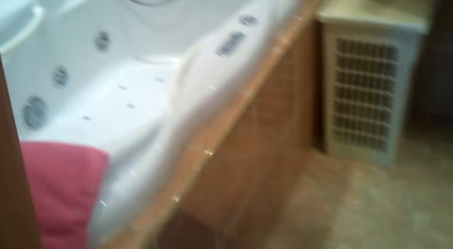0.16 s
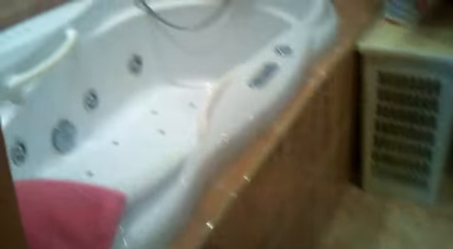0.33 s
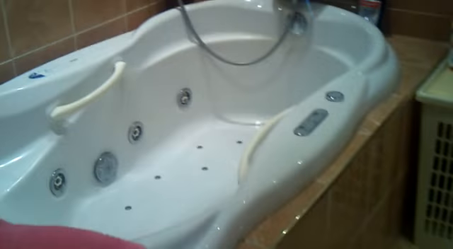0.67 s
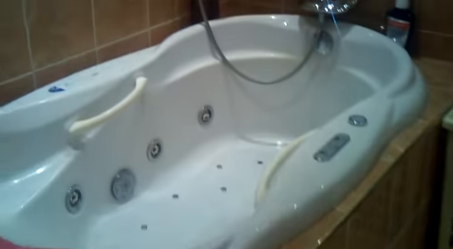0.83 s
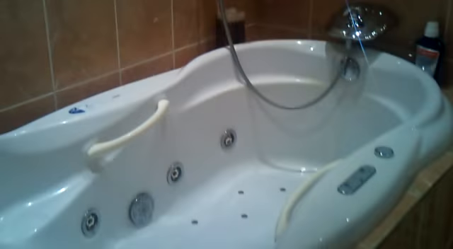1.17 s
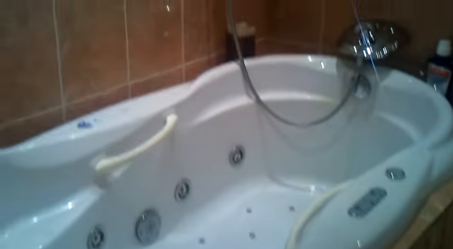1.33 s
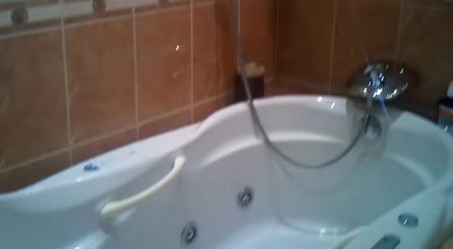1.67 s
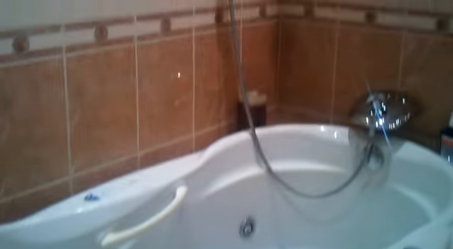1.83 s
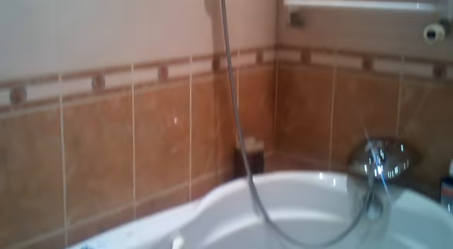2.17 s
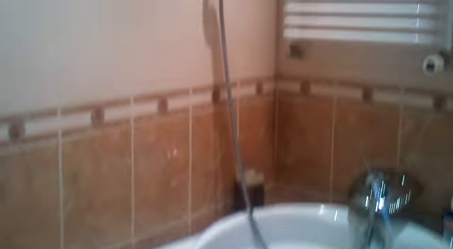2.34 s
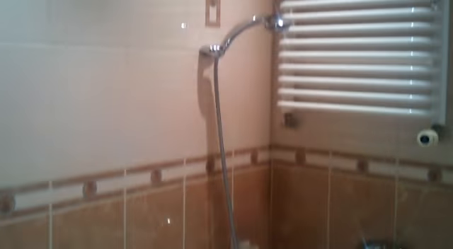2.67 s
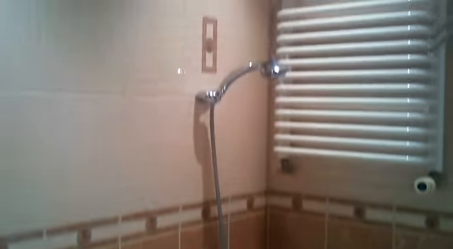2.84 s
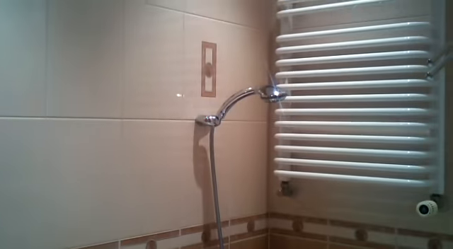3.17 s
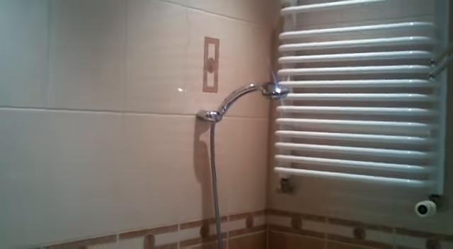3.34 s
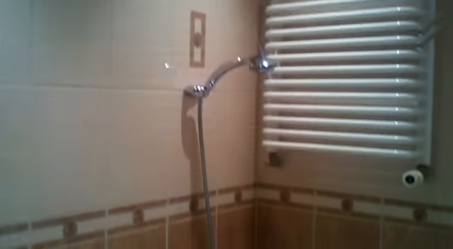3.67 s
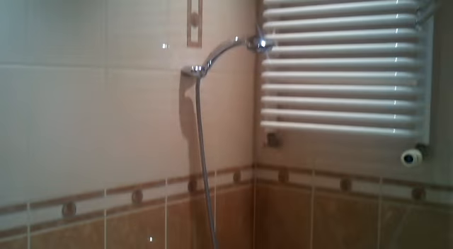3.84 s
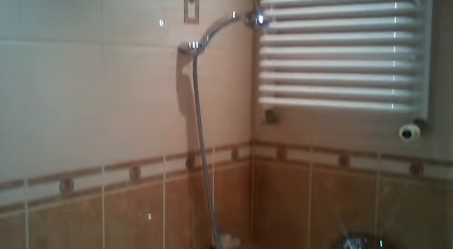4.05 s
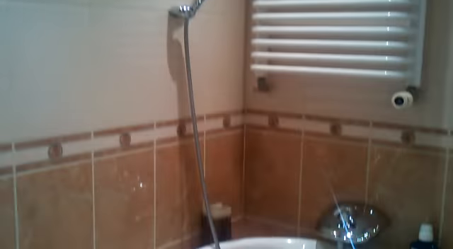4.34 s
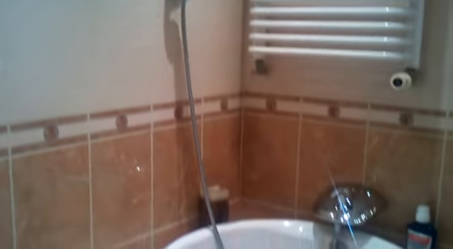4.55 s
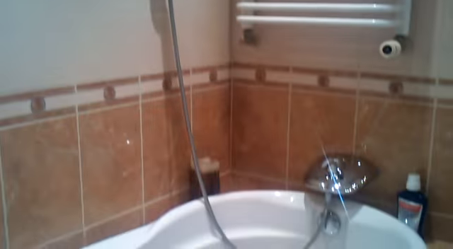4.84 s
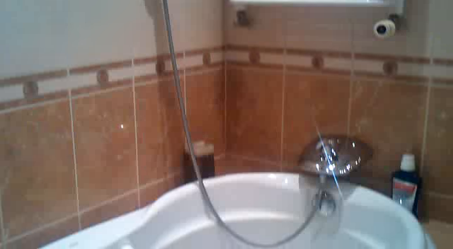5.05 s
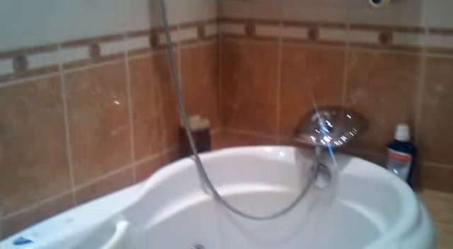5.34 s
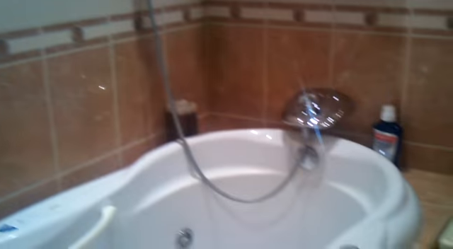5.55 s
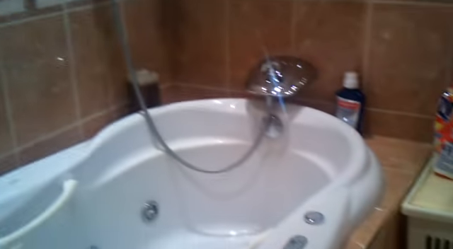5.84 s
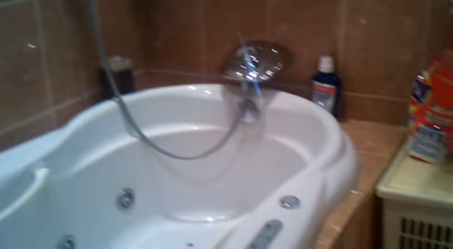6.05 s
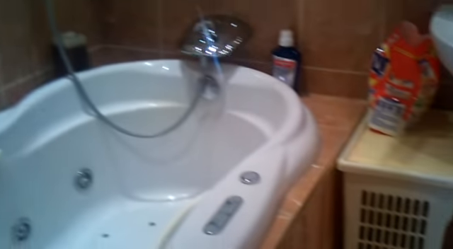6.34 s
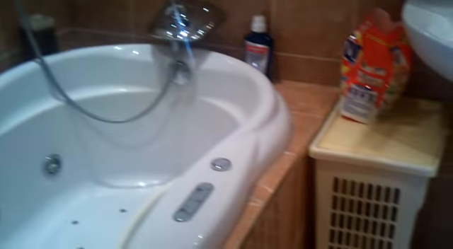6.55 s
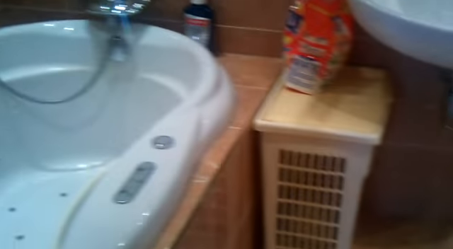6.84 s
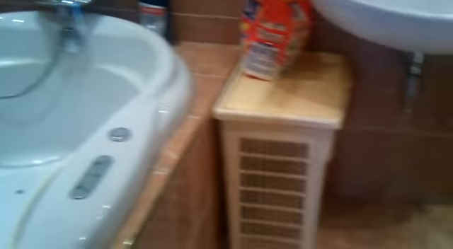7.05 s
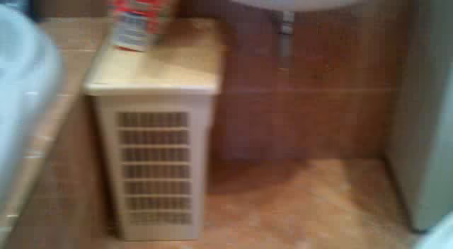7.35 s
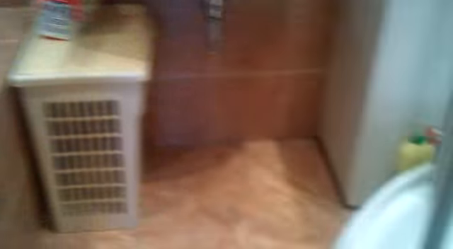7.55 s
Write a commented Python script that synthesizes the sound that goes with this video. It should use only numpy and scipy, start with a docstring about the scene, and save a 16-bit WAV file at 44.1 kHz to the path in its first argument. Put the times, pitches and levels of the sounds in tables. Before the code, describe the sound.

Close handling noise opens the scene: skin rustles on plastic, with small snaps and soft thuds right at the microphone. Behind it, a quiet bathroom holds a constant low hum and the faint tone of a small motor. The hand goes mostly still, leaving occasional ticks. Later a fingertip squeaks faintly and the grip shifts with the loudest click, then rubbing and quick clicks continue to the end.

```python
"""A quiet tiled bathroom: room murmur, mains hum and a small motor, perhaps a heating pump, run throughout.
At first, fingers rub a small hand-held camera and its plastic case creaks with snaps and dull knocks.
From about 3 s the hand settles, leaving a few stray ticks; at 6.3 s a fingertip squeaks thinly.
Then the grip shifts: the hardest click, at 6.9 s, ducks the gain, and rubbing and snaps run to the end."""
import sys
import numpy as np
from scipy import signal
from scipy.fft import rfft, irfft
from scipy.io import wavfile

SR = 44100
rng = np.random.default_rng(int(sys.argv[2]) if len(sys.argv) > 2 else 0)


def generate_wav(signal):
    """Clip the signal to [-1, 1] and save it as 16-bit WAV at the path in sys.argv[1]."""
    frames = np.transpose(np.atleast_2d(signal))
    scaled = np.clip(frames, -1, 1) * 32767
    pcm = np.round(scaled).astype(np.int16)
    wavfile.write(sys.argv[1], SR, pcm)


N = 340083
TIME = np.arange(N) / SR


def amp(db):
    """Decibels to linear gain."""
    return 10 ** (np.asarray(db) / 20)


def unit(x):
    """Scales to rms 1."""
    return x / np.sqrt(np.mean(x ** 2) + 1e-20)


def add(mix, start_s, sound):
    """Drops a one-shot into the mix."""
    part = mix[max(round(start_s * SR), 0):][:len(sound)]
    part += sound[:len(part)]


def drift(rate_hz):
    """Slow random modulation of rms 1."""
    hz = np.fft.rfftfreq(N, 1 / SR)
    return unit(irfft(rfft(rng.standard_normal(N)) / (1 + (hz / rate_hz) ** 4), N))


def coloured(x, eq):
    """Shapes x with an EQ curve, at rms 1."""
    hz, db = np.transpose(eq)
    gain = amp(np.interp(np.log(np.fft.rfftfreq(N, 1 / SR) + 1), np.log(hz), db))
    return unit(irfft(rfft(x) * gain, N))


def tone(hz, unsteady, rate_hz):
    """A sine of rms 1 whose strength and phase wander by the share `unsteady`."""
    wobble = (drift(rate_hz) + 1j * drift(rate_hz)) / np.sqrt(2)
    wander = np.sqrt(1 - unsteady ** 2) + unsteady * wobble
    cycles = np.cumsum(hz * np.ones(N)) / SR + rng.random()
    return unit((wander * np.exp(2j * np.pi * cycles)).real)


# EQ of the room murmur and microphone hiss: frequency_hz, relative_db
ROOM_EQ = [(15, -71.5), (42, -67), (75, -70), (150, -70.5), (260, -77), (400, -81.5), (600, -79.5),
           (1000, -84.5), (1800, -88), (2700, -92), (4000, -97.5), (6500, -99.5), (10000, -101),
           (14000, -102.5)]

def room(level_db=-45.5):
    """An even bed of murmur that thins into hiss."""
    return amp(level_db) * coloured(rng.standard_normal(N), ROOM_EQ)


# Low drone of mains hum and motor vibration: pitch_hz, level_db, unsteady_share
HUM_TONES = [(100.26, -39.5, 0), (198.8, -58, 0), (48.6, -51, 0.52), (140, -59.5, 1)]

def hum():
    """A firm tone at twice the mains frequency, with weaker tones around it, some of them restless."""
    return sum(amp(db) * tone(hz, unsteady, rate_hz=3.3) for hz, db, unsteady in HUM_TONES)


# Level ride of the motor along the camera's path through the room: time_s, fundamental_db, octave_db
MOTOR_RIDE = [(0.0, -48.5, -59.5), (0.5, -47.5, -55), (1.05, -51.5, -56.5), (1.9, -49.5, -53.5),
              (3.05, -45, -61.0), (3.6, -45.5, -55.5), (4.5, -46.0, -55.0), (5.1, -48, -52.0),
              (6.3, -48.0, -53.0), (6.8, -48.5, -58.5), (7.7, -54, -55.5)]

def motor(pitch_hz=362.28):
    """A clean tone and its octave, swelling and fading with the place in the room."""
    times, fundamental_db, octave_db = np.transpose(MOTOR_RIDE)
    fundamental = amp(np.interp(TIME, times, fundamental_db)) * tone(pitch_hz, 0.093, rate_hz=4.8)
    octave = amp(np.interp(TIME, times, octave_db)) * tone(2 * pitch_hz, 0.083, rate_hz=9.2)
    return fundamental + octave


def stroke(start_s, length_s, attack=0.11, release=0.34):
    """Envelope of one finger movement; attack and release are shares of its length."""
    progress = (TIME - start_s) / length_s
    return np.clip(np.minimum(progress / attack, (1 - progress) / release), 0, 1)


def squeak(start_s=6.26, length_s=0.28, pitch_hz=5000, sag_hz_per_s=800, level_db=-59.5):
    """A fingertip sticks and slips near a mode of the shell: a fuzzy whistle that swells and sags."""
    hz = pitch_hz - sag_hz_per_s * (TIME - start_s)
    swell = stroke(start_s, length_s, attack=0.55, release=0.3)
    return amp(level_db) * swell * tone(hz, unsteady=0.85, rate_hz=100.0)


# Boxy resonances of the whole case flexing: pitch_hz, width_hz, gain_db
BODY_MODES = [(341.5, 168, 3), (450, 580, -10), (725, 460, -9)]
# Bright resonances of its thin shell: pitch_hz, width_hz, gain_db
SHELL_MODES = [(1840, 5300, 5.5), (2970, 540, 2), (4020, 800, -1), (5280, 1200, 8.5), (6730, 1800, 0.5)]

def ring(x, modes):
    """The plastic resonates: x passes through damped modes side by side."""
    return sum(amp(db) * signal.lfilter(*signal.iirpeak(hz, hz / width, SR), x)
               for hz, width, db in modes)


# EQ of skin rustling on plastic: frequency_hz, relative_db
RUSTLE_EQ = [(200, -45), (700, 0), (1500, 0), (2800, 0), (4000, -4), (5200, -3.5), (6800, -11), (9000, -14),
             (13000, -22)]
# Finger strokes over the case: start_s, length_s, rustle_db, rub_db
FINGER_STROKES = [(-.05, 0.31, -53.5, -53), (.15, 1.32, -55, -57.5), (0.397, 0.091, -69, -41),
                  (1.42, 1.1, -60, -58), (1.94, 0.73, -56, -72), (2.598, 0.72, -60, -74),
                  (6.5, 0.66, -61, -55), (6.84, 0.13, -48.5, -41.5), (6.896, 1.03, -52, -45.5),
                  (7.052, 0.05, -49, -46), (7.134, 0.026, -42, -38.5)]

def fingers(resting_rustle_db=-64, resting_rub_db=-58, slips_per_s=400, rub_band_hz=(140, 550)):
    """Skin drags unevenly over plastic: a rustle on top, tiny slips rubbing low in the body of the case."""
    rustle_power, rub_power = amp(resting_rustle_db) ** 2, amp(resting_rub_db) ** 2
    for start_s, length_s, rustle_db, rub_db in FINGER_STROKES:
        motion = stroke(start_s, length_s)
        rustle_power += (amp(rustle_db) * motion) ** 2
        rub_power += (amp(rub_db) * motion) ** 2
    drag = rng.standard_normal(N) * amp(1.3 * drift(rate_hz=42.0))
    slips = (rng.random(N) < slips_per_s / SR) * rng.choice([-1, 1], N)
    creep = slips * amp(2.0 * rng.standard_normal(N))  # no two slips equally strong
    soft_creep = signal.lfilter(*signal.butter(2, rub_band_hz, "band", fs=SR), creep)
    rubbing = unit(ring(soft_creep, BODY_MODES))
    return np.sqrt(rustle_power) * coloured(drag, RUSTLE_EQ) + np.sqrt(rub_power) * rubbing


def slip(modes, cutoff_hz, stutter=0.0, edge=0.0, settle_s=0.0011, low_cut_hz=80.0):
    """One jerk rings the modes; stutter adds dying after-slips, edge lets unsoftened bite through."""
    jerks = signal.unit_impulse(1500)
    after_s = rng.uniform(0.00022, 0.0017, 3)
    jerks[(after_s * SR).astype(int)] += stutter * rng.uniform(-1.53, 1, 3) * np.exp(-after_s / settle_s)
    softened = signal.sosfilt(signal.butter(4, cutoff_hz, fs=SR, output="sos"), jerks)
    push = signal.lfilter(*signal.butter(2, low_cut_hz, "high", fs=SR), softened + edge * jerks)
    sound = ring(push, modes)
    return sound / np.linalg.norm(sound) * np.sqrt(0.006 * SR)  # the energy of 6 ms at rms 1


# Dull knocks of the case under a shifting grip: start_s, level_db, cutoff_hz
GRIP_KNOCKS = [(0.1024, -34.5, 890), (0.3649, -29, 1070), (.383, -39, 1300), (0.4347, -35, 340),
               (0.4591, -36.5, 430), (0.4704, -31.5, 440), (1.4851, -31, 800), (1.5047, -31, 1000),
               (1.5289, -31, 1350), (1.5601, -34, 950), (1.6084, -31.5, 895), (2.3539, -29.5, 590),
               (2.4136, -33, 1080), (2.438, -37, 560), (4.4493, -39, 540), (4.481, -35.5, 1100),
               (7.082, -32.5, 517), (7.603, -37, 350), (7.619, -33.5, 1200), (7.6587, -31, 700)]

def knocks(tick_db_per_octave=10):
    """A soft slip flexes the body; the shell ticks faintly with it, more for a harder contact."""
    out = np.zeros(N)
    for start_s, level_db, cutoff_hz in GRIP_KNOCKS:
        tick_db = level_db - 18.5 + tick_db_per_octave * np.log2(cutoff_hz / 1000)
        thud = amp(level_db) * slip(BODY_MODES, cutoff_hz)
        tick = amp(tick_db) * slip(SHELL_MODES, cutoff_hz=3300, stutter=0.99)
        add(out, start_s, thud + tick)
    return out


# Sharp snaps of the case under pressure: start_s, snap_db, cutoff_hz, spot_pitch_hz, thud_db
CASE_SNAPS = [(0.0195, -39, 3000, 2800, -32.5), (0.2333, -38, 4430, 3000, -31.5),
              (0.4896, -44.5, 3300, 3000, -36.5), (1.1504, -46.5, 3000, 2600, -49),
              (1.444, -33, 4500, 640, -30), (1.5186, -36.5, 3780, 2720, -51),
              (2.051, -26.5, 6000, 1650, -35.5), (4.1352, -47.5, 12000, 7400, -44),
              (4.3268, -38, 4630, 4360, -60), (5.4217, -32.5, 4550, 667, -29),
              (6.3987, -51, 7000, 5600, -52), (6.8776, -26, 6870, 3680, -37),
              (6.9158, -21.5, 8800, 835, -16), (7.2244, -39.5, 2340, 1390, -52),
              (7.467, -41.5, 5000, 5500, -31.5), (7.511, -41.5, 4380, 5400, -30),
              (7.5301, -44, 4400, 1200, -32), (7.55, -32.5, 4380, 1720, -31),
              (7.5788, -42, 5030, 5240, -28.5), (7.6414, -40.5, 4500, 1000, -29.5),
              (7.665, -41.5, 4200, 3470, -28.5)]

def snaps(spot_width_hz=390.0, spot_db=11.5):
    """Each snap rings the shell and the pressed spot and thuds the body, heard dry through the case."""
    out = np.zeros(N)
    for start_s, snap_db, cutoff_hz, spot_pitch_hz, thud_db in CASE_SNAPS:
        modes = [*SHELL_MODES, (spot_pitch_hz, spot_width_hz, spot_db)]
        add(out, start_s, amp(snap_db) * slip(modes, cutoff_hz, stutter=1.0, edge=0.057))
        add(out, start_s, amp(thud_db) * slip(BODY_MODES, cutoff_hz=1290))
    return out


def scene():
    """Mono mix: the bathroom bed under the close handling noise."""
    return (room() + hum() + motor() + squeak() + fingers() + knocks() + snaps())[None]


def record(dry, threshold_db=-11.5, recovery_db_per_s=49.0, slope=0.93, attack_s=0.0095, top_hz=14100):
    """Gain control ducks just after a loud peak and creeps back; a high cut follows."""
    over_db = np.maximum(20 * np.log10(abs(dry[0]) + 1e-9) - threshold_db, 0)
    recovery_db = TIME * recovery_db_per_s
    held_db = np.maximum.accumulate(over_db + recovery_db) - recovery_db
    lag = np.exp(-1 / (attack_s * SR))
    duck_db = slope * signal.lfilter([1 - lag], [1, -lag], held_db)
    high_cut = signal.firwin(511, top_hz, window=("kaiser", 9), fs=SR)
    return signal.oaconvolve(dry * amp(-duck_db), high_cut[None], "same")


dry = scene()
out = record(dry)
generate_wav(out)
```